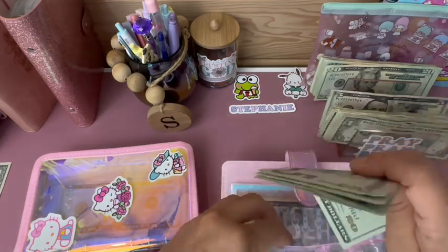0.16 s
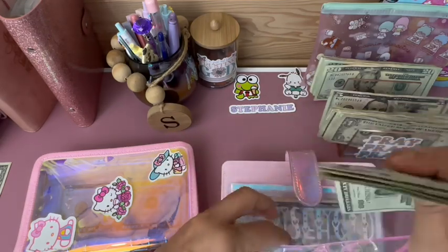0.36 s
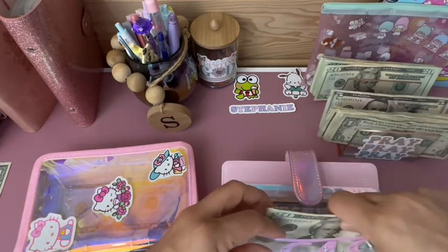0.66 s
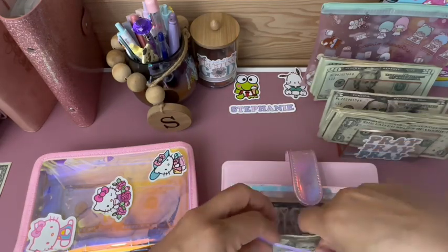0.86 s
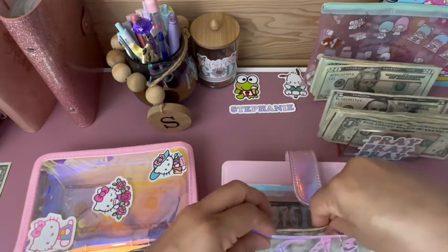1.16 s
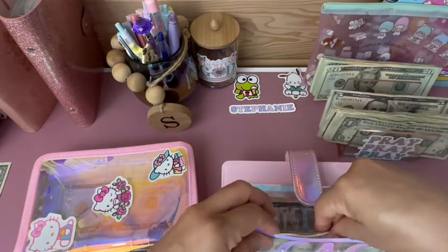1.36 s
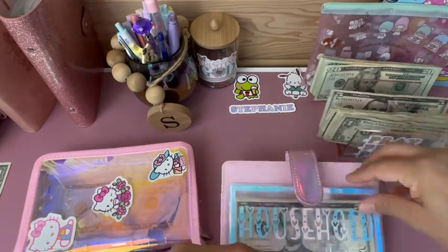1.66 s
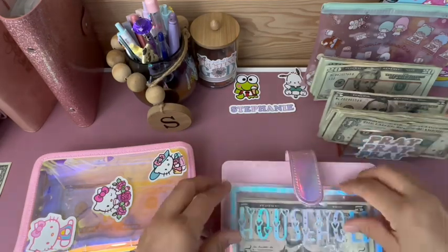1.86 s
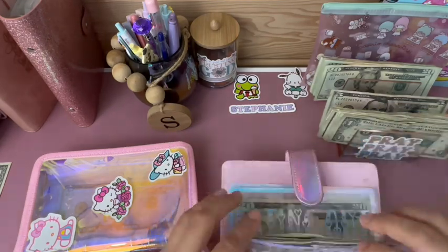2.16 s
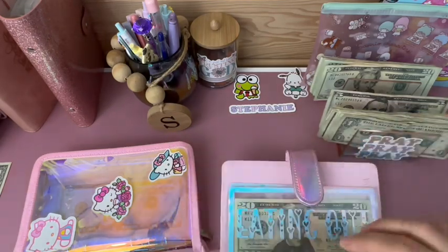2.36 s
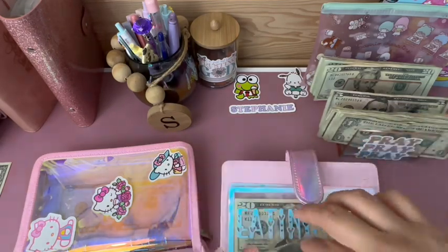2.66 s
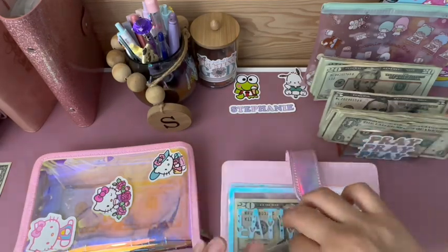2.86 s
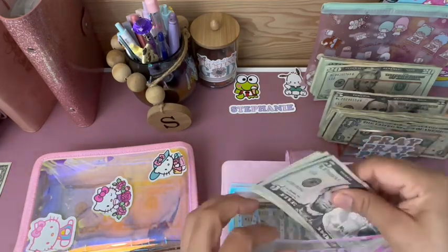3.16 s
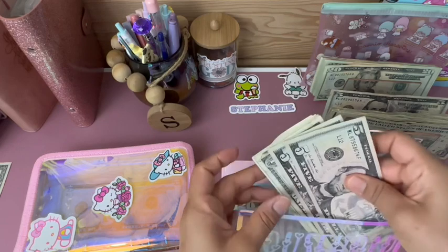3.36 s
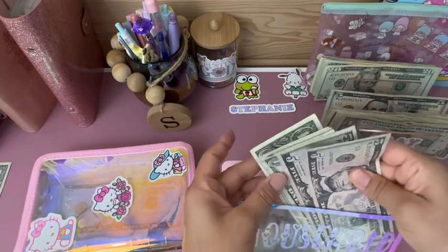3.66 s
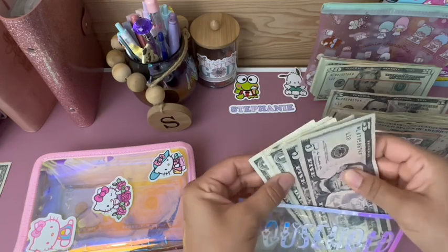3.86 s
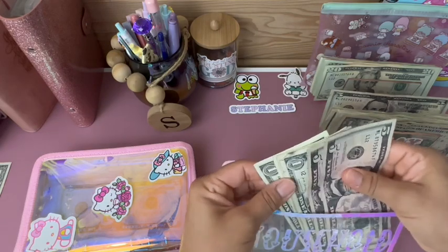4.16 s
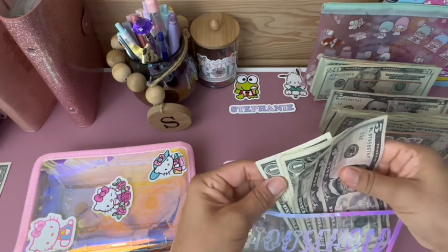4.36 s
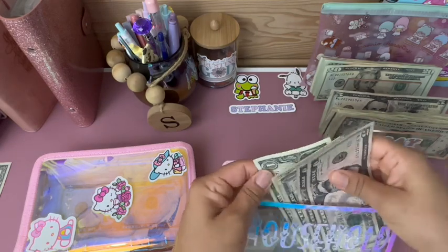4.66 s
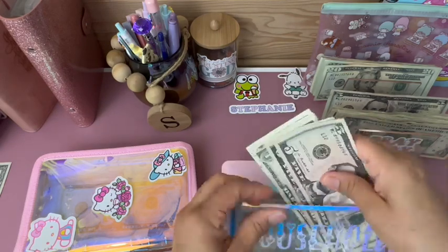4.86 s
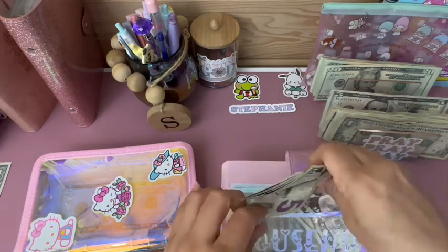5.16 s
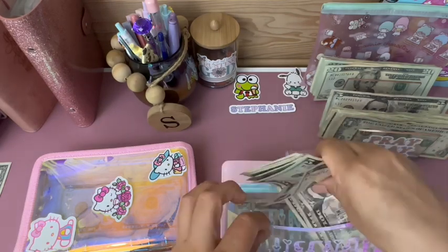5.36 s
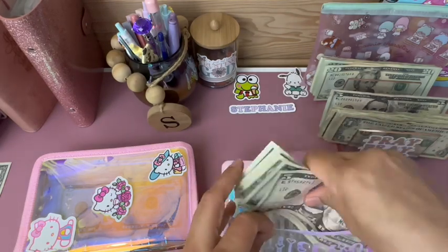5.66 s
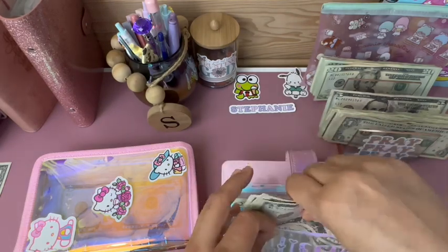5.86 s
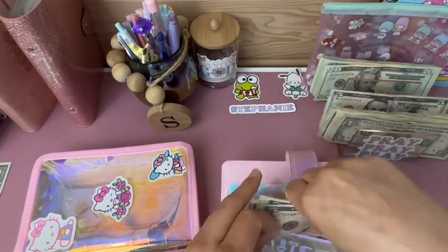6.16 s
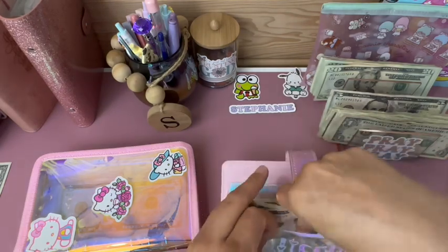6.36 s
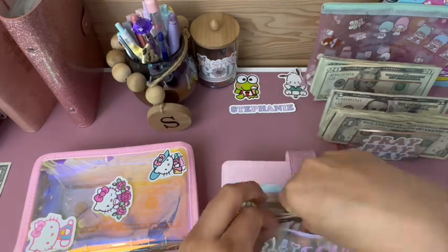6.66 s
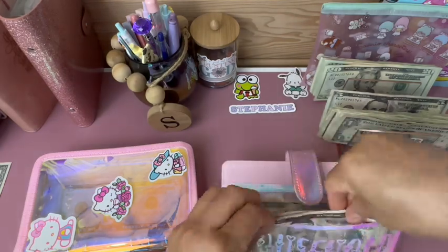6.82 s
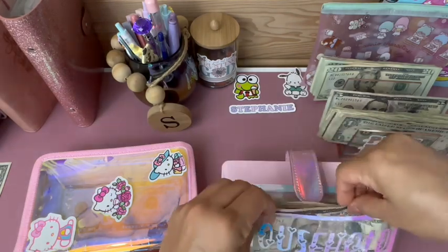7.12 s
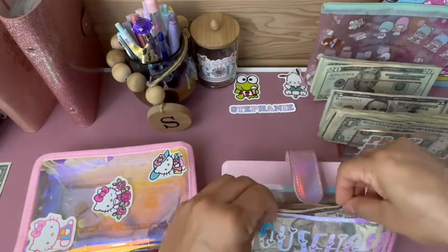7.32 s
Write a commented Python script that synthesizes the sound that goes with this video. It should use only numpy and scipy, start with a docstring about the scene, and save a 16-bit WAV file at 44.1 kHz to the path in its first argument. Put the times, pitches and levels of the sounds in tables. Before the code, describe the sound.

Close, dry handling of banknotes and stiff vinyl: short rustles, crisp creases, light finger taps and a hard desk knock in a quiet small room.

```python
"""Banknotes are handled at a vinyl binder pocket on a desk in a small room, over a low hum and faint hiss.
First a stack is tucked in while the desk takes one sharp knock; then the pocket is turned and smoothed down.
Next, notes are drawn out, fanned and counted; at last they are squared up and pushed back in, with snaps.
Paper and vinyl slide as shaped noise, creases snap as short noise bursts, and taps ring as fading sines.
The knock is a tone of steeply falling pitch, the hum a wavering sine over a narrow rumble."""
import sys
import numpy as np
from scipy import signal
from scipy.fft import rfft, irfft
from scipy.io import wavfile
from scipy.ndimage import map_coordinates

SR = 44100
rng = np.random.default_rng(int(sys.argv[2]) if len(sys.argv) > 2 else 0)


def put_to_file(sound):
    """Save the sound as 16-bit audio at rate SR, in the file named by the first command-line argument."""
    columns = np.atleast_2d(sound).T  # one column per channel
    safe = np.clip(columns, -1, 1)
    whole_steps = np.round(safe * 32767)
    wavfile.write(sys.argv[1], SR, whole_steps.astype(np.int16))


N = 330210


def from_db(db):
    """Decibels to gain."""
    return 10 ** (np.asarray(db) / 20)


def rms_one(x):
    """Scale to rms 1."""
    return x / np.sqrt(np.mean(x ** 2) + 1e-20)


def in_time(rows):
    """Read the columns of a (seconds, values) curve at every sample."""
    s, *columns = np.transpose(rows)
    return [np.interp(np.arange(N) / SR, s, column) for column in columns]


def at_hz(points, hz):
    """Read a (Hz, value) table on a log-frequency axis."""
    f, value = np.transpose(points)
    return np.interp(np.log(np.maximum(hz, 1)), np.log(f), value)


def drift(rate):
    """A random course of rms 1, joining two random points per cycle of the rate (Hz)."""
    knots = rng.standard_normal(int(N / SR * rate * 2) + 2)
    return rms_one(np.interp(np.arange(N) / SR * rate * 2, np.arange(len(knots)), knots))


def band(x, low, high):
    """Band-pass between two frequencies in Hz."""
    sos = signal.butter(2, [low, min(high, .45 * SR)], "band", fs=SR, output="sos")
    return signal.sosfilt(sos, x)


def coloured(x, spectrum):
    """Give a signal a (Hz, dB) spectrum."""
    n = x.shape[-1]
    return irfft(rfft(x) * from_db(at_hz(spectrum, np.fft.rfftfreq(n, 1 / SR))), n)


# How alike left and right are.
# Each row: frequency in Hz, likeness from 0 (unrelated) to 1 (the same).
LEFT_RIGHT_LIKENESS = [(60, 1), (150, 0.54), (400, 0.79), (1200, 0.2), (2400, 0.37), (4400, 0.11),
                       (8000, 0.024), (13500, 0.44)]


def left_right(pair):
    """Two unrelated signals become left and right, alike in the bass and mostly apart in the treble."""
    n = pair.shape[-1]
    alike = at_hz(LEFT_RIGHT_LIKENESS, np.fft.rfftfreq(n, 1 / SR))
    mid, side = rfft(pair)
    return irfft(np.sqrt(1 + alike) * mid + np.sqrt(1 - alike) * side * [[1], [-1]], n)


def stereo_noise(n):
    """White noise of n samples, made into left and right."""
    return left_right(rng.standard_normal((2, n)))


def resonate(x, modes):
    """Lift each (Hz, width Hz, dB) resonance out of the signal; negative dB makes a dip."""
    for hz, width, lift_db in modes:
        r = np.exp(-np.pi * width / SR)
        poles = [1, -2 * r * np.cos(2 * np.pi * hz / SR), r * r]
        peak = (1 - r * r) / 2 * signal.lfilter([1, 0, -1], poles, x)
        x = x + (from_db(lift_db) - 1) * peak
    return x


def add(out, sound, s):
    """Mix a sound in at a time in seconds."""
    i = int(s * SR)
    out[:, i:i + sound.shape[1]] += sound[:, :N - i]


# Strokes of the hands: tucking in from 0 s, turning and smoothing the pocket from 1.4 s,
# drawing out and counting from 2.9 s, squaring up and pushing back in from 5.2 s.
# Each row: start in seconds, length in seconds, then levels in dB for flexing, rubbing and sliding,
# before the layers' own trims.
HAND_STROKES = [ (0.0, 0.029, -57, -53, -57), (0.06, 0.32, -71, -60, -63.5), (0.203, 0.047, -61, -60, -76),
                (0.38, 0.082, -58, -55.5, -76), (0.472, 0.075, -61, -57, -52.5),
                (0.543, 0.044, -55, -51.5, -53.5), (0.714, 0.022, -53, -56.5, -58),
                (0.784, 0.1, -63, -58.5, -67), (0.904, 0.038, -57.5, -59, -54),
                (1.053, 0.072, -87, -63.5, -72), (1.164, 0.047, -65, -59.5, -61.5),
                (1.367, .04, -65, -51.5, -58), (1.412, 0.067, -49, -48.5, -49.5),
                (1.536, 0.038, -53, -48, -53), (1.644, 0.017, -50, -63, -48), (1.71, 0.13, -75, -64.5, -65),
                (1.993, 0.057, -59, -52, -55), (2.048, 0.014, -57, -52.5, -55),
                (2.206, 0.017, -52.5, -48, -49), (2.265, 0.053, -59, -54.5, -56),
                (2.483, 0.048, -53.5, -56, -64), (2.566, 0.013, -55, -53, -57.5),
                (2.62, 0.15, -89, -79, -61.5), (2.753, 0.055, -60, -56, -59.5),
                (2.872, .14, -58, -47.5, -49.5), (3.017, 0.15, -64, -57.5, -53.5),
                (3.186, .16, -58, -55, -55.5), (3.41, 0.061, -68, -56, -52),
                (3.518, 0.028, -63.5, -59.5, -79), (3.688, .055, -56, -61.5, -61.5),
                (3.8, 0.088, -71.5, -67.5, -61.5), (4.014, 0.11, -66, -66, -64),
                (4.178, 0.092, -84, -68, -63.5), (4.49, 0.06, -83, -65, -58.5),
                (4.562, 0.26, -60, -59, -55.5), (4.755, 0.17, -57.5, -57.5, -64),
                (4.984, 0.14, -62.5, -57.5, -56), (5.234, 0.1, -59, -57.5, -60.5),
                (5.356, 0.058, -55.5, -52, -53), (5.454, 0.2, -56, -56, -54.5),
                (5.622, 0.049, -50, -48, -47.5), (5.686, 0.14, -66, -55.5, -58),
                (5.864, 0.11, -57.5, -56, -58), (5.984, 0.13, -57, -53.5, -56.5),
                (6.176, 0.078, -57, -53.5, -63), (6.326, 0.085, -53.5, -57.5, -60),
                (6.414, 0.11, -58, -52.5, -59), (6.521, 0.11, -61, -54, -59.5),
                (6.63, 0.055, -54.5, -55, -56), (6.71, 0.074, -60.5, -58.5, -59.5),
                (6.8, 0.058, -57, -50.5, -57), (6.903, 0.096, -67, -56.5, -61.5),
                (7.05, 0.067, -67, -56.5, -64), (7.192, 0.026, -60.5, -55.5, -59),
                (7.305, 0.032, -71, -56, -64), (7.356, 0.089, -69, -58.5, -63.5)]
# Notes merely held stir a little: flexing, rubbing and sliding, each in dB before the same trims.
HELD_LEVELS = (-103, -87, -104)


def handling(attack_s=0.011, swell_share=0.13, sag_db_per_s=6.5, release_db_per_s=177, grip_db=1.25, grip_hz=28):
    """Each stroke swells (a long one more gently), sags and dies away; powers add up under an uneven grip."""
    t = np.arange(0, N, 40) / SR
    power = from_db(HELD_LEVELS)[:, None] ** 2 * np.ones(len(t))
    for s, length_s, *levels_db in HAND_STROKES:
        age = np.maximum(t - s, 0)
        swell = np.minimum(age / (attack_s + swell_share * length_s), 1)
        fall_db = sag_db_per_s * age + release_db_per_s * np.maximum(age - length_s, 0)
        power = power + np.outer(from_db(levels_db), swell * from_db(-fall_db)) ** 2
    gains = in_time(np.column_stack([t, *np.sqrt(power)]))
    # the fingers catch and let go, shaking all three gains together
    return gains * from_db(grip_db * drift(grip_hz))


def shifting(x, depth_db, steps_per_s=30, steps_per_octave=9):
    """A bending sheet keeps changing its resonances: narrow peaks and valleys come and go."""
    hz, s, cells = signal.stft(x, SR, nperseg=1024)
    octaves = np.log2(1 + hz / 500)
    where = np.meshgrid(octaves * steps_per_octave, s * steps_per_s, indexing="ij")
    chance = map_coordinates(rng.standard_normal((96, 512)), where, order=1, mode="wrap")
    return signal.istft(cells * from_db(depth_db * chance), SR)[1][:, :N]


# Resonances of the pocket and binder, heard in the friction here and in the snaps below.
# Each row: frequency in Hz, width in Hz, lift in dB.
POCKET_RESONANCES = [(357, 166, 10.5), (930, 180, 8), (1234, 86, 8.5), (1928, 110, 6.5), (2217, 270, 5),
                     (3830, 930, 0.5), (4040, 110, 1.5), (9800, 900, 9)]


def friction(spectrum, per_s, spread_db, grain_s, smooth, flutter_db, shift_db=3.5):
    """Fibres slip in a smooth hiss while tiny creases give way at random, each a short burst."""
    sizes = from_db(spread_db * np.minimum(rng.exponential(1, N), 3.5))
    born = rng.random(N) < per_s * from_db(4 * drift(8)) / SR   # the rate itself wanders
    power = signal.lfilter([1], [1, -np.exp(-2 / (grain_s * SR))], born * sizes ** 2 + 1e-18)
    # smooth: power of the steady hiss, compared with the bursts' average
    envelope = np.sqrt(smooth + power / power.mean()) * from_db(flutter_db * drift(16))
    noise = shifting(rng.standard_normal((2, N)), shift_db)
    return rms_one(resonate(coloured(left_right(noise * envelope), spectrum), POCKET_RESONANCES))


# Tone colours of the flexing pocket, the rubbing notes, the sliding notes and their sizzling edges.
# Each row of all four: frequency in Hz, relative level in dB.
FLEX_COLOUR = [(30, -23), (80, 3.5), (130, 0.5), (250, -8), (400, -10), (650, -9.5), (1000, -54),
               (2000, -58)]
RUB_COLOUR = [(60, -70), (300, -16), (550, -28), (800, -2.5), (1500, -1.5), (2200, -1), (3200, -4),
              (4500, -4.5), (8000, -47)]
SLIDE_COLOUR = [(1800, -31), (3000, -1), (4000, -2.5), (6000, 3.5), (8000, -3), (9800, -0.5), (11300, -16),
                (14000, -15)]
SIZZLE_COLOUR = [(5000, -21), (9800, -4.5), (11500, -23), (13500, 9.5), (15800, -5.5)]


def rustle(flexing, rubbing, sliding, flex_db=0.0, rub_db=-3.0, slide_db=-0.5, sizzle_db=-7.0):
    """The pocket flexes, notes rub on each other and slide along the vinyl, their edges sizzling."""
    flex = friction(FLEX_COLOUR, per_s=49, spread_db=3.0, grain_s=0.0017, smooth=0.81, flutter_db=1.0)
    rub = friction(RUB_COLOUR, per_s=160, spread_db=3.5, grain_s=0.024, smooth=0.67, flutter_db=1.5)
    slide = friction(SLIDE_COLOUR, per_s=260, spread_db=0.5, grain_s=0.0016, smooth=6.4, flutter_db=1.03)
    sizzle = friction(SIZZLE_COLOUR, per_s=150, spread_db=4.0, grain_s=.001, smooth=2.0, flutter_db=3.5)
    out = from_db(flex_db) * flexing * flex + from_db(rub_db) * rubbing * rub
    return out + sliding * (from_db(slide_db) * slide + from_db(sizzle_db) * sizzle)


def crinkles(rubbing, per_s=55, spread_db=3.5, cycles=3.3, level_db=-9.0, count=18):
    """Under the rubbing, small facets of the paper flip over, each ringing a few cycles at its own pitch."""
    sizes = from_db(spread_db * np.minimum(rng.exponential(1, N), 3)) * rng.choice([-1, 1], N)
    flips = sizes * (rng.random(N) < per_s / SR)
    facet = rng.integers(0, count, N)
    t = np.arange(SR // 40) / SR
    out = 0
    for k, hz in enumerate(np.geomspace(600, 5000, count)):
        burst = stereo_noise(len(t)) * np.exp(-t * hz / cycles)
        ring = rms_one(band(burst, hz / 1.45, hz * 1.64))
        out = out + signal.oaconvolve((flips * (facet == k))[None], ring, axes=1)[:, :N]
    return from_db(level_db) * rubbing * rms_one(out)


# Edges in Hz of the four pitch ranges of a snap: thud, body, crack and sizzle.
RANGE_EDGES = [150, 700, 2500, 6500, 16000]


def snap(levels_db, fade_s, rise_s=0.00061, low_linger=1.4, hold=1.7, after_db=-18.0,
         sheet_db=8.0, sheet_q=15.0, size=4096):
    """A sheet buckles: a burst of bending waves, ringing at pitches drawn anew for each snap."""
    t = np.arange(size) / SR
    pitches = np.geomspace(1500, 14000, num=8) * 2 ** rng.uniform(-.25, .25, 8)
    sheet = [(hz, hz / sheet_q, sheet_db) for hz in pitches]
    first = int(.009 * SR)   # the level is set over the first 9 ms
    out = 0
    for k, level_db in enumerate(levels_db):
        low, high = RANGE_EDGES[k], RANGE_EDGES[k + 1]
        age = t / (fade_s * hold * (low_linger if k == 0 else 1))
        # the crease runs for a few milliseconds, stops, and the sheet shivers on
        fade = np.exp(-age ** 2) + from_db(after_db) * np.exp(-age / 2)
        envelope = (1 - np.exp(-(t / rise_s) ** 2)) * fade
        burst = resonate(stereo_noise(size) * envelope, POCKET_RESONANCES + sheet)
        burst = band(band(burst, low, high), low / 2, high * 1.28)
        loudness = np.sqrt(np.mean(burst[:, :first] ** 2, axis=1, keepdims=True))
        out = out + from_db(level_db) * burst / loudness
    return out


# Creases and stiff vinyl snapping.
# Each row: start in seconds, level in dB at the centre before the range trims, centre pitch in Hz,
# spread in octaves, left over right in dB, fade time in seconds before snap() stretches it.
CREASE_SNAPS = [(0.5436, -36.5, 3100, 1.9, -1, 0.0038), (0.5481, -41, 1280, 1.8, 10, 0.0024),
                (0.644, -60.5, 9000, 1.7, 3, 0.0037), (0.7047, -50.5, 2000, 1.56, 5, 0.0035),
                (0.748, -55.5, 1200, 3, 4, 0.0018), (0.7826, -50, 600, 1.6, -1, 0.0028),
                (0.8039, -45.5, 2400, 3, 0.5, 0.0032), (0.9214, -36, 5100, 2.2, .5, 0.0029),
                (1.252, -57.5, 2400, 2.4, 1, 0.003), (1.3794, -49.5, 2500, 1.7, 3, 0.0014),
                (1.3815, -33.5, 900, 1.11, 0.5, 0.0053), (1.4251, -46.5, 2200, 1.9, 2, 0.0075),
                (1.4639, -37.5, 750, 2.8, 0.5, 0.0028), (1.543, -42, 1250, 1.16, -5, 0.0055),
                (1.5554, -51.5, 2000, 4.5, 5, 0.0095), (1.589, -46.5, 550, 1.5, 0, 0.007),
                (1.648, -40.5, 1810, 1.65, -4, 0.012), (1.663, -42.5, 1900, 2.03, 9, 0.0019),
                (1.9646, -58.5, 1500, 3.2, 0, 0.0074), (1.9917, -56.5, 9000, 3.4, 1, .0031),
                (2.0472, -50, 300, 2.2, -2, 0.0035), (2.076, -47, 2600, 1.5, 2, 0.0049),
                (2.1433, -39, 2440, 2.22, 0.5, 0.0043), (2.508, -51, 705, 2.7, 1, 0.004),
                (3.0054, -44.5, 1510, 3.3, -3, 0.0045), (3.1667, -48.5, 2110, 1.8, 0.5, 0.019),
                (3.7028, -48, 600, 1.03, -1.5, 0.015), (3.747, -55.5, 11200, 2.8, 1, 0.0034),
                (4.008, -59, 13000, 1, 2, 0.0017), (4.0697, -49, 700, 1.0, -2, 0.0018),
                (4.1061, -51.5, 766, 1.5, 0, 0.0016), (4.29, -63, 12000, 3.5, 1, 0.0065),
                (4.5672, -48, 5500, 1.6, 1, 0.0023), (4.609, -42, 1700, 1.1, -1.5, 0.0034),
                (4.8416, -50.5, 3530, 3.3, -2, 0.0046), (4.9794, -45.5, 3120, 1.23, -1, 0.0018),
                (5.009, -55, 3500, 1.8, 1, .005), (5.0565, -48, 744, 1.7, -1, 0.0037),
                (5.0924, -42, 5500, 1.3, 3.5, 0.0029), (5.1991, -43.5, 1360, 2.1, 0, .0036),
                (5.2775, -49, 950, 2.33, 1, 0.0049), (5.6433, -47.5, 600, 3.7, -1, 0.0083),
                (5.7247, -48.5, 1100, 2.4, 1, 0.0089), (5.77, -52, 7500, 1, 5, .008),
                (5.8958, -50.5, 2460, 3.2, 2.5, 0.0038), (5.9725, -44, 1000, 2.34, 1, 0.0034),
                (6.068, -46.5, 1390, 1.8, 2, 0.0047), (6.2016, -46.5, 1000, 2.1, -0.5, 0.01),
                (6.3695, -38.5, 650, 1.2, 1, 0.0029), (6.396, -40, 2550, 2.3, -1, 0.0046),
                (6.402, -26, 1880, 1.28, 2, 0.0041), (6.4066, -30, 845, 1.1, -2, 0.0032),
                (6.5727, -43.5, 517, 1.4, 2, 0.0044), (6.6227, -33, 800, 1.9, -5, 0.0032),
                (6.6317, -31.5, 1390, 1.73, 5.5, .0019), (6.8557, -46, 1120, 1.5, 1, 0.0017),
                (6.965, -53.5, 1500, 1.8, -5, 0.0036), (7.021, -46.5, 1800, 1, 1, 0.006),
                (7.0568, -39, 1160, 1.84, 3, 0.003), (7.133, -48, 4200, 0.79, 5.5, 0.0017),
                (7.1921, -53.5, 1280, 1.86, 4, 0.0056), (7.3851, -55, 3520, 2.1, 3, 0.0091)]


def snaps(range_trims_db=(-1.0, -0.7, -0.5, 5.5), skirt_db=6.0):
    """Before trims, snaps peak at a centre pitch: low for the slack pocket, high for a crisp crease."""
    out = np.zeros((2, N))
    range_hz = np.sqrt(np.multiply(RANGE_EDGES[:-1], RANGE_EDGES[1:]))
    for s, level_db, centre_hz, spread, pan_db, fade_s in CREASE_SNAPS:
        # one spread away from its centre a snap is weaker by the skirt
        levels_db = level_db - skirt_db * (np.log2(range_hz / centre_hz) / spread) ** 2
        pan = from_db([[pan_db / 2], [-pan_db / 2]])
        add(out, snap(levels_db + range_trims_db, fade_s) * pan, s)
    return out


# Fingers tapping the stiff pocket.
# Each row: start in seconds, level in dB, pitch in Hz.
FINGER_TAPS = [(1.3828, -23, 912), (2.144, -22, 2050), (4.0697, -46, 930), (4.771, -46, 1157),
               (4.902, -49.5, 780), (5.075, -43.5, 810), (5.261, -43.5, 934), (6.3693, -38.5, 482),
               (6.547, -35, 1200)]
# What a tap rings with.
# Each row: multiple of the pitch, level in dB on top of the tap's, cycles until it is 60 dB down.
TAP_RINGS = [(1.0, 6.5, 15.4), (1.42, 4, 12), (2.36, -8, 120)]


def taps(rise_s=0.0012, soft_hz=2600):
    """A fingertip bends the pocket and lets it ring briefly; soft skin excites little treble."""
    t = np.arange(SR // 10) / SR
    out = np.zeros((2, N))
    for s, level_db, hz in FINGER_TAPS:
        ring = 0
        for multiple, mode_db, cycles in TAP_RINGS:
            turns = t * hz * multiple
            ring = ring + from_db(mode_db - 60 * turns / cycles) * np.sin(2 * np.pi * turns)
        add(out, from_db(level_db) * ring * (1 - np.exp(-t / rise_s)) * np.ones((2, 1)), s)
    return signal.sosfilt(signal.butter(4, soft_hz, fs=SR, output="sos"), out + 1e-18)


# Fingertips dragging over vinyl.
# Each row: start in seconds, level in dB, pitch in Hz, length in seconds.
FINGER_SCUFFS = [(1.553, -38, 1124, 0.017), (1.745, -63.5, 1080, 0.049), (2.286, -57, 2030, 0.024),
                 (2.456, -62, 2000, 0.064), (2.514, -51, 810, 0.018), (2.568, -52, 1900, 0.029),
                 (2.757, -57.5, 2040, 0.053), (3.159, -49, 2170, 0.02), (6.33, -68, 3570, 0.024),
                 (6.411, -55, 2130, 0.056)]


def scuffs(q=2.95, grit_db=4.0):
    """Skin sticks and slips on the vinyl, which answers in one narrow band."""
    out = np.zeros((2, N))
    grit = from_db(grit_db * drift(140))
    for s, level_db, hz, length_s in FINGER_SCUFFS:
        n, i = int(length_s * SR), int(s * SR)
        noise = band(stereo_noise(SR // 4)[:, :n], hz * (1 - .5 / q), hz * (1 + .5 / q))
        add(out, from_db(level_db) * rms_one(noise * np.hanning(n) ** .5 * grit[i:i + n]), s)
    return out


def knock(s=.7311, gain_db=-7.0, fall_hz=1600, end_hz=25, spread_s=.00085, fade_s=0.0015,
          rise_s=.0001, soft_hz=1800, right_db=-12.5):
    """A knock runs through the desk top: high bending waves arrive first, so the pitch falls steeply."""
    t = np.arange(SR // 10) / SR
    hz = end_hz + fall_hz / (1 + t / spread_s)
    fade = np.exp(-t / fade_s) + 0.057 * np.exp(-t / 0.02)
    wave = -np.sin(2 * np.pi * np.cumsum(hz) / SR) * (1 - np.exp(-t / rise_s)) * fade
    wave = signal.sosfilt(signal.butter(2, soft_hz, fs=SR, output="sos"), wave)   # a soft contact
    out = np.zeros((2, N))
    sides = np.array([[1], [-from_db(right_db)]])   # the two sides move in opposition
    add(out, from_db(gain_db) * wave * sides, s)
    return out


# Colour of the room's tail. Each row: frequency in Hz, relative level in dB.
TAIL_COLOUR = [(100, -1), (400, 4.5), (1200, -2.5), (2500, -1.5), (6000, -1), (16000, -3)]
# How fast the tail dies. Each row: frequency in Hz, seconds to fall by 60 dB.
TAIL_T60 = [(200, 0.12), (530, 0.25), (1400, 0.35), (3700, 0.3), (9700, 0.24), (16000, 0.075)]


def room(x, onset_s=0.0019):
    """Diffuse reflections of a small room, dying away band by band."""
    t = np.arange(SR // 2) / SR
    edges = np.geomspace(100, 17000, num=9)
    tail = 0
    for low, high in zip(edges, edges[1:]):
        hz = np.sqrt(low * high)
        level_db = at_hz(TAIL_COLOUR, hz) - 60 * t / at_hz(TAIL_T60, hz)
        tail = tail + band(stereo_noise(len(t)), low, high) * from_db(level_db)
    tail = tail * (1 - np.exp(-(t / onset_s) ** 2))
    return signal.fftconvolve(x, tail / np.sqrt(np.sum(tail ** 2) / 2), axes=1)[:, :N]


# Slow course of the hum.
# Each row: time in seconds, level in dB before the hum's own trim and waver.
HUM_COURSE = [(0.0, -53), (1.25, -61), (1.5, -54.5), (2.95, -57), (3.15, -50), (3.7, -50), (4.1, -54),
              (5.6, -58), (6.4, -55.5), (7.49, -62.5)]


def hum(hz=67.3, waver_hz=2.664, waver_db=1.46, rumble_db=-4.0, trim_db=-1.0):
    """A low hum wavers at random in pitch and strength over a narrow rumble."""
    tone = np.sqrt(2) * np.sin(2 * np.pi * np.cumsum(hz + waver_hz * drift(3.4)) / SR)
    rumble = rms_one(band(band(stereo_noise(N), 56.4, 76.6), 37.6, 89.4))
    level_db = in_time(HUM_COURSE)[0] + trim_db + waver_db * drift(8.1)
    return from_db(level_db) * (tone + from_db(rumble_db) * rumble)


# Colour of the background hiss. Each row: frequency in Hz, relative level in dB.
HISS_COLOUR = [(25, -3), (60, 5), (115, 16.5), (170, 3), (300, 0.5), (600, -8.5), (1500, -11), (2300, -7),
               (4500, -19.5), (5800, -7.5), (6900, -1.5), (9000, -9), (11500, -30), (15000, -20)]


def hiss(level_db=-66.0):
    """A faint steady noise with a fixed spectrum."""
    return from_db(level_db) * rms_one(coloured(stereo_noise(N), HISS_COLOUR))


def scene():
    """Paper and vinyl close by; the room answers the snaps, taps and scuffs."""
    flexing, rubbing, sliding = handling()
    paper = rustle(flexing, rubbing, sliding) + crinkles(rubbing)
    cracks = snaps() + taps() + scuffs()
    reflections = from_db(-9.5) * room(cracks)
    return paper + cracks + knock() + reflections + hum() + hiss()


# A broad dip in the treble around 11 kHz.
# Each row: frequency in Hz, width in Hz, change in dB.
TREBLE_DIPS = [(11180, 4550, -11.5), (11440, 4000, -13)]


def record(dry, cutoff_hz=16350):
    """Dip the treble near 11 kHz and cut the top with a steep low-pass."""
    steep = signal.ellip(10, .1, 80, cutoff_hz, fs=SR, output="sos")
    return signal.sosfilt(steep, resonate(dry, TREBLE_DIPS))


dry = scene()
out = record(dry)
put_to_file(out)
```